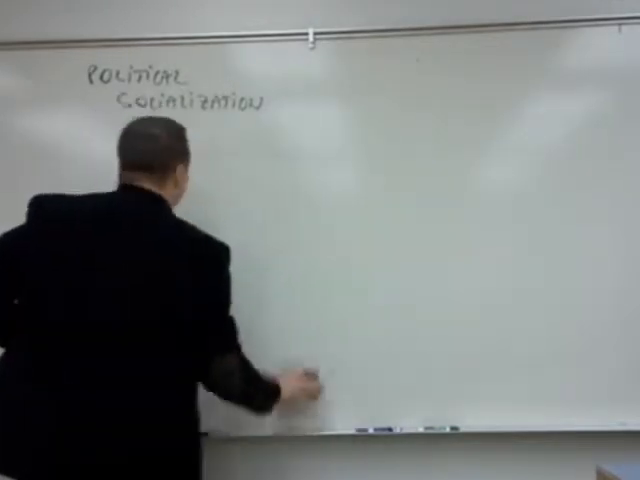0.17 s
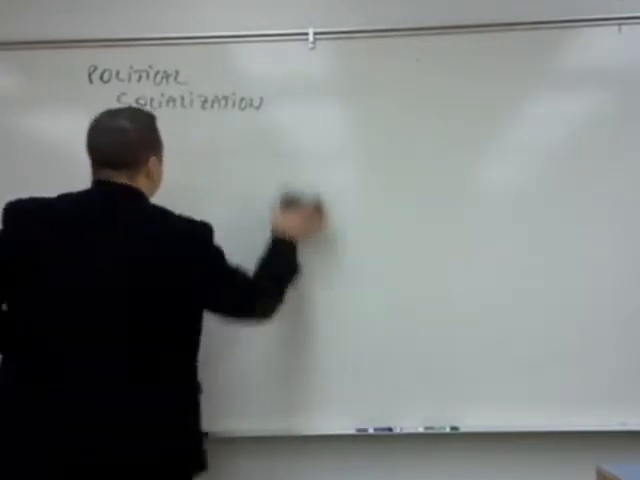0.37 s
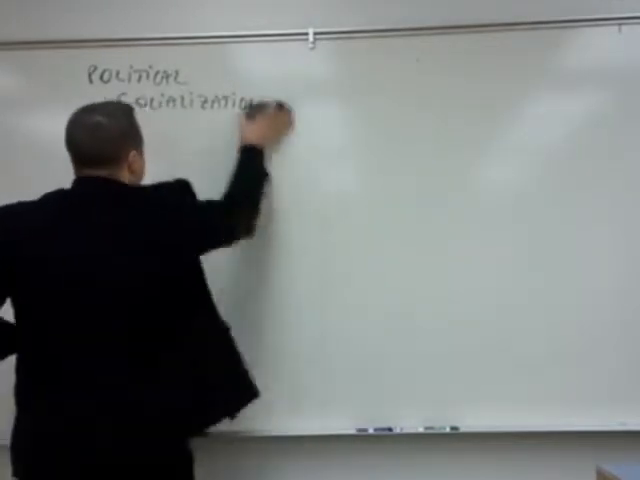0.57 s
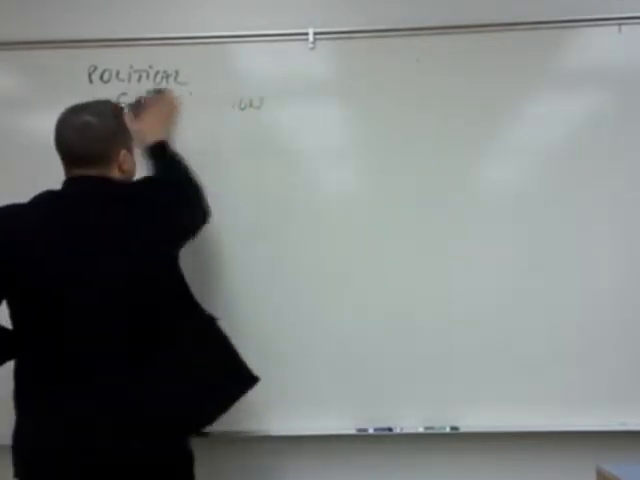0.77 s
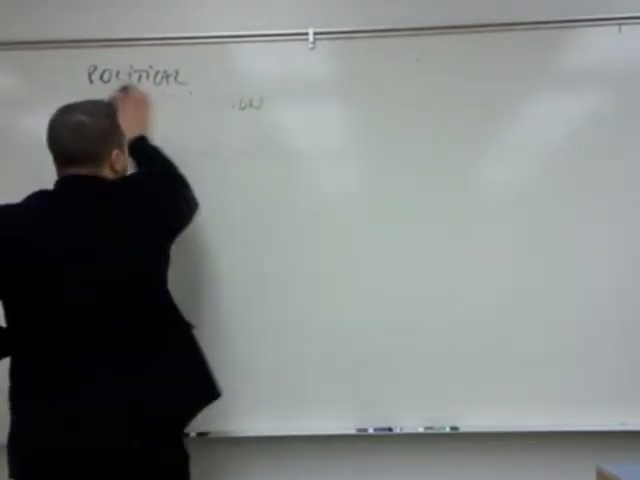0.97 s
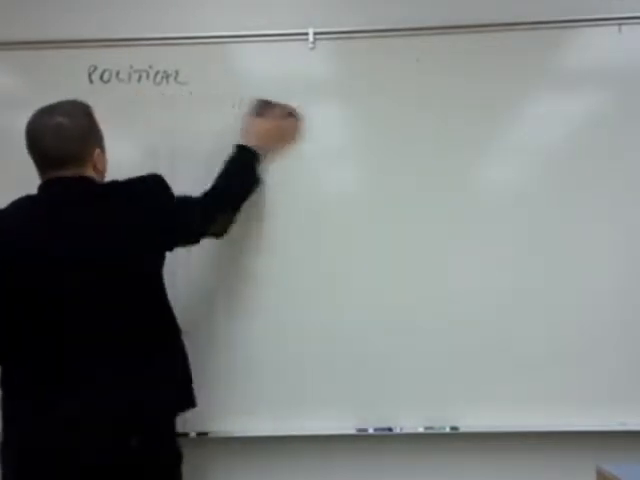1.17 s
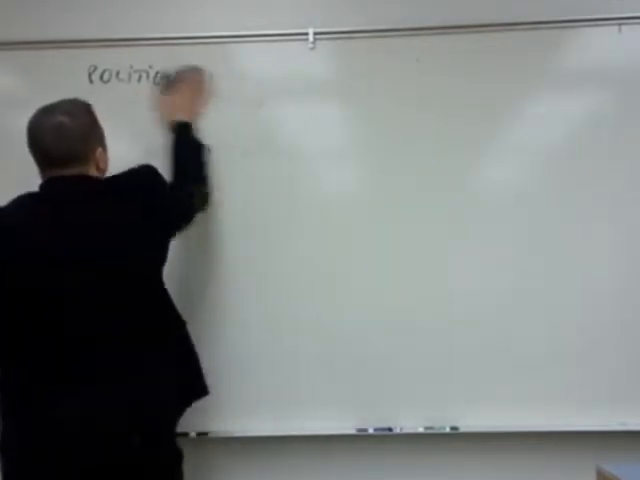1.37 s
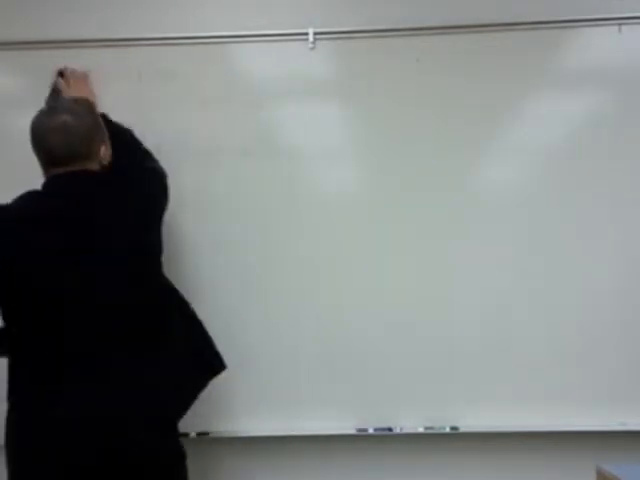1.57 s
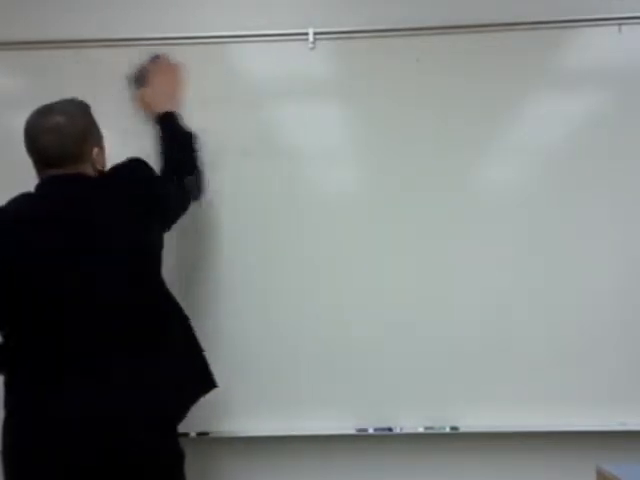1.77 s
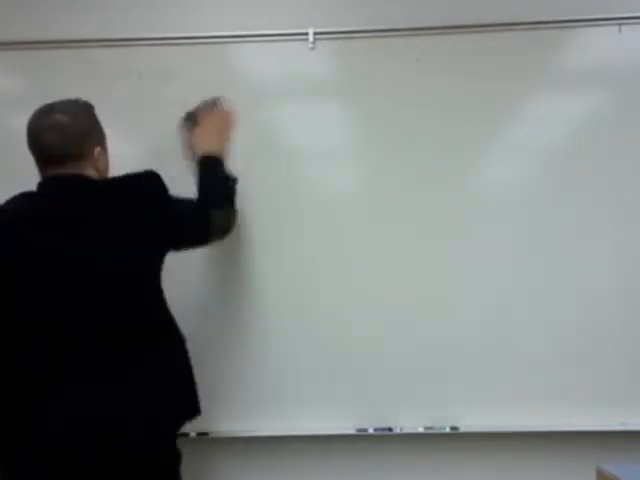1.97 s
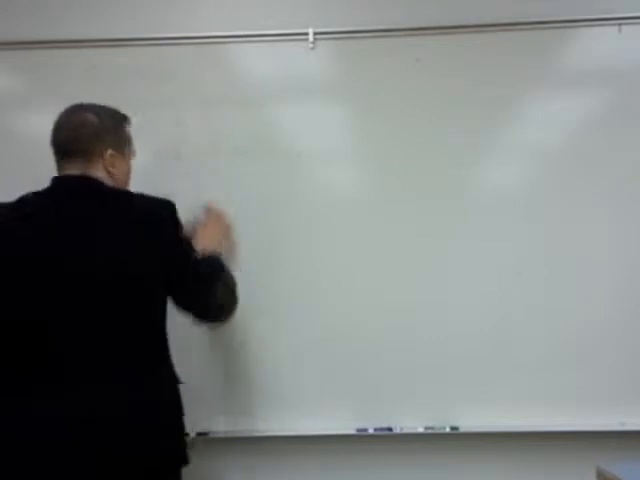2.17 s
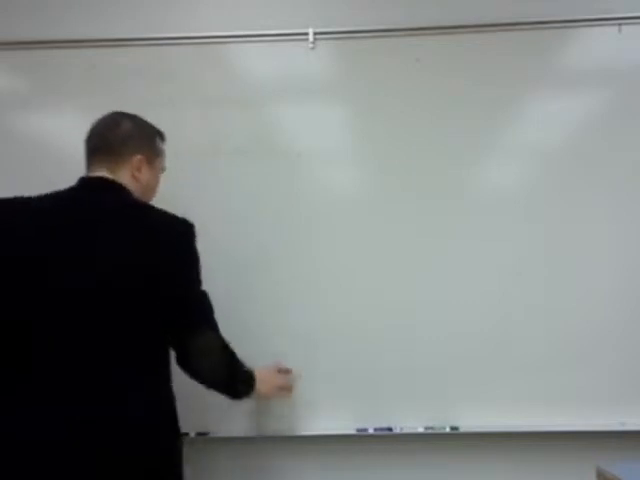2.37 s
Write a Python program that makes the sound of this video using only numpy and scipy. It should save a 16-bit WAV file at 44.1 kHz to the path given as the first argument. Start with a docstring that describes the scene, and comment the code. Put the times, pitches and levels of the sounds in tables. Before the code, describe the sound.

Quick, scratchy eraser strokes rub over a whiteboard with a few clicks and bumps, framed by a soft knock and sleeve rustle at each end. The quiet classroom hums faintly, heard from across the room through a slightly shrill microphone.

```python
"""A quiet classroom: ventilation rumbles and the lights hum throughout. A felt eraser knocks and scuffs
off the tray of a whiteboard, and a sleeve rustles as the arm rises. From about 0.8 s the felt hisses
over the board in quick strokes, with a few clicks and bumps; near 2.3 s the arm comes down and the
eraser knocks again. A small stereo microphone across the room hears it all, with a shrill port
resonance on each side and an expander that lets the room noise rise whenever the eraser is loud."""
import sys
import numpy as np
from scipy import signal
from scipy.fft import rfft, irfft
from scipy.io import wavfile

SR = 44100
rng = np.random.default_rng(int(sys.argv[2]) if len(sys.argv) > 2 else 0)


def generate_wav(sig):
    """Save sig (samples, or channels by samples) to the path in sys.argv[1] as 16-bit PCM at SR."""
    pcm = np.round(np.clip(np.atleast_2d(sig).T, -1, 1) * 32767).astype(np.int16)
    wavfile.write(sys.argv[1], SR, pcm)


N = 106104
ROOM_T60_S, ROOM_WET_DB = 0.85, -13


def amp(db):
    """dB to gain."""
    return 10 ** (np.asarray(db) / 20)


def unit(x):
    """Scale to rms 1."""
    return x / np.sqrt(np.mean(x ** 2) + 1e-20)


def envelopes(rows):
    """One gain curve for each dB column of a timed table, silent outside its span."""
    times, *columns = np.transpose(rows)
    return [amp(np.interp(np.arange(N) / SR, times, db, left=-120, right=-120)) for db in columns]


def at_hz(points):
    """A table read at every FFT bin on a log axis."""
    hz, v = np.transpose(points)
    return np.interp(np.log(np.arange(N // 2 + 1) * SR / N + 1), np.log(hz), v)


def colour(x, spectrum):
    """Give x a spectrum; rms 1."""
    return unit(irfft(rfft(x) * amp(at_hz(spectrum)), N))


def resonate(x, hz, width_hz, lift_db):
    """Lift one resonant band of x."""
    r = np.exp(-np.pi * width_hz / SR)
    poles = [1, -2 * r * np.cos(2 * np.pi * hz / SR), r * r]
    peak = signal.lfilter(np.array([1, 0, -1]) * (1 - r * r) / 2, poles, x)
    return x + (amp(lift_db) - 1) * peak


def drift(rate_hz):
    """Slow chance, spread 1."""
    r = np.exp(-2 * np.pi * rate_hz / SR)
    return unit(signal.lfilter([1], [1, -2 * r, r * r], rng.standard_normal(N + SR))[SR:])


def linger(gain, time_s):
    """Power follows with a lag."""
    r = np.exp(-1 / (time_s * SR))
    return np.sqrt(signal.lfilter([1 - r], [1, -r], gain ** 2))


# Stereo image, narrow lows and wide highs. Each row: frequency in Hz, left-right correlation.
STEREO_LIKENESS = [(40, 0.98), (130, 0.96), (290, 0.84), (630, 0.51), (1200, 0.014), (2500, 0.19),
                   (4500, 0.077), (8000, 0.16), (14400, 0.035)]
def spread(streams, left_lag_s=0.00005):
    """Two streams become a stereo pair, alike mainly in the bass, the left a little late."""
    mid, side = rfft(streams)
    alike = at_hz(STEREO_LIKENESS)
    pair = np.sqrt(1 + alike) * mid + np.sqrt(1 - alike) * side * [[1], [-1]]
    bin_hz = np.arange(N // 2 + 1) * SR / N
    delay = np.exp(-2j * np.pi * bin_hz * left_lag_s * np.array([[1], [0]]))
    return irfft(pair * delay, N)


# Tone of the air bed. Each row: frequency in Hz, relative level in dB.
AIR_EQ = [(25, -12), (45, -2.5), (65, -2), (78, -0.5), (89, 2), (108, -6), (135, -2.5), (175, -3.5),
          (225, -9), (300, -7.5), (400, -13), (500, -14), (1000, -22), (2000, -26.5), (4000, -28.5),
          (8000, -36), (15000, -31.5)]
def ventilation(level_db=-51, flutter_db=0.3):
    """Moving air lays down a bass-heavy bed of noise that flutters faintly."""
    gain = amp(level_db + flutter_db * drift(12))
    return gain * colour(spread(rng.standard_normal((2, N))), AIR_EQ)


# Partials of the hum. Each row: frequency in Hz, rms level in dB.
HUM_PARTIALS = [(120, -62), (360, -61.5), (600, -73), (720, -76), (1200, -83), (1680, -79.5)]
def lights(waver_db=2.5, wander_rad=0.35):
    """The lights hum at multiples of the mains buzz, each wavering in level and phase."""
    t, hum = np.arange(N) / SR, np.zeros(N)
    for hz, db in HUM_PARTIALS:
        gain = np.sqrt(2) * amp(db + waver_db * drift(5))
        phase = 2 * np.pi * (hz * t + rng.random()) + wander_rad * drift(14)
        hum += gain * np.sin(phase)
    return hum


def friction(slips_per_s=12000, unevenness_db=1.5):
    """Felt fibres slip in dense, tiny, uneven jerks: a grainy stereo noise."""
    sizes = amp(unevenness_db * np.minimum(rng.exponential(1, (2, N)), 4))
    signs = rng.choice([-1, 1], (2, N))
    slipping = rng.random((2, N)) < slips_per_s / SR
    return spread(sizes * signs * slipping)


def in_room(gain):
    """The envelope of a rub heard from afar: part direct, part hanging on in the room."""
    wet = amp(ROOM_WET_DB)
    tail = linger(gain, ROOM_T60_S / np.log(1e6))
    return np.hypot(np.sqrt(1 - wet ** 2) * gain, wet * tail)


# Off the tray, then the sleeve as the arm rises. Each row: time in seconds, rub in dB, drag in dB.
LIFT_LEVELS = [(0.0, -64, -80), (0.06, -56.5, -77), (0.12, -59.5, -64), (0.17, -54, -72), (0.198, -54, -68),
               (0.206, -45.5, -74), (0.222, -48.5, -68), (0.26, -51, -62), (0.29, -52, -54.5),
               (0.34, -52.5, -56.5), (0.37, -58.5, -66.5), (0.76, -58.5, -68), (0.85, -78, -76)]
# The sleeve as the arm comes down. Each row: time in seconds, rub in dB.
LOWER_LEVELS = [(2.33, -78), (2.38, -56.5), (2.41, -56.5)]
# Tones of the broad rub and the duller drag. Each row: frequency in Hz, relative level in dB.
RUB_EQ = [(200, -36), (700, 0), (1300, 4), (2500, -2), (4000, -1), (6000, -1), (9000, -4), (15000, -4.5)]
DRAG_EQ = [(800, -14), (1500, -14), (2200, 2), (3000, 5.5), (3800, 3.5), (5000, -7), (8000, -38)]
# The hollow tray sings along with the rub. Each row: centre in Hz, width in Hz, lift in dB.
TRAY_RESONANCES = [(733, 26, 13), (7060, 390, 3.5)]
def handling():
    """Felt scuffs and a sleeve rustles as the eraser leaves the tray and comes down again."""
    lift_gain, drag_gain = envelopes(LIFT_LEVELS)
    lower_gain = envelopes(LOWER_LEVELS)[0]
    rub = colour(friction(), RUB_EQ)
    for resonance in TRAY_RESONANCES:
        rub = resonate(rub, *resonance)
    drag = colour(friction(), DRAG_EQ)
    return in_room(lift_gain + lower_gain) * rub + in_room(drag_gain) * drag


# Modes of the eraser block. Each row: frequency in Hz, relative level in dB, seconds to fall 60 dB.
BLOCK_MODES = [(486, 0.5, 0.025), (467, 4, 0.04), (716.4, -10, 0.17), (1220, -13.5, 0.053)]
# Hits of the block. Each row: start in seconds, ring in dB, hardness as a tilt of the modes in dB per
# octave, click in dB before its low-pass, that low-pass in Hz, panel thud in dB.
BLOCK_HITS = [(0.055, -52, -10, -70, 3000, -39.5), (0.2099, -63, 14, -44, 8600, -61),
              (0.780, -76, -4, -34, 3200, -90), (1.074, -73, 3, -37, 9000, -55),
              (1.086, -60, 4, -37, 9000, -67), (2.169, -66, -6, -64, 3000, -38),
              (2.375, -46.5, -18, -66, 3000, -42.5), (2.401, -49.5, -14, -73, 3000, -77)]
def knocks(click_t60_s=0.004, thud_hz=109, thud_t60_s=0.081, rise_s=0.00051):
    """Each contact clicks, rings the block's modes and draws a low thud from the panel."""
    t = np.arange(SR // 10) / SR
    attack = 1 - np.exp(-t / rise_s)
    track = np.zeros(N + SR)
    for start_s, ring_db, hardness, click_db, top_hz, thud_db in BLOCK_HITS:
        ring = np.zeros(len(t))
        for hz, db, t60_s in BLOCK_MODES:
            tilt_db = hardness * np.log2(hz / BLOCK_MODES[0][0])
            mode_db = ring_db + db + tilt_db + rng.normal(0, 1)
            ring += amp(mode_db - 60 * t / t60_s) * np.sin(2 * np.pi * hz * t)
        burst = amp(click_db - 60 * t / click_t60_s) * rng.choice([-1, 1], len(t))
        click = signal.sosfilt(signal.butter(4, top_hz, fs=SR, output="sos"), burst)
        thud = amp(thud_db - 60 * t / thud_t60_s) * np.sin(2 * np.pi * thud_hz * t)
        track[int(start_s * SR):][:len(t)] += (ring + thud) * attack + click
    return track[:N]


def classroom(x, fade_in_s=0.0032):
    """The walls add a diffuse, dying stereo tail to the direct sound."""
    t = np.arange(N) / SR
    envelope = amp(-60 * t / ROOM_T60_S) * np.clip(t / fade_in_s, 0, 1)
    tail = spread(rng.standard_normal((2, N))) * envelope
    tail = tail[:, :SR // 2] / np.sqrt(np.sum(tail ** 2, axis=1, keepdims=True))
    wet = amp(ROOM_WET_DB)
    return np.sqrt(1 - wet ** 2) * x + wet * signal.fftconvolve(x[None], tail, axes=1)[:, :N]


# The strokes. Each row: time in seconds, hiss in dB, drag in dB, hollow panel scrape in dB.
STROKE_LEVELS = [(0.765, -79, -74, -80), (0.78, -57.5, -69, -61), (0.81, -50.5, -55.5, -65),
                 (0.845, -49, -57, -65), (0.88, -47.5, -53.5, -64), (0.93, -48.5, -55.5, -62),
                 (0.99, -49.5, -58.5, -64.5), (1.052, -55.5, -60, -73), (1.072, -52, -60, -55.5),
                 (1.115, -50, -64.5, -58), (1.19, -47, -60.5, -63), (1.28, -45.5, -74, -81),
                 (1.345, -50, -61, -77), (1.375, -48.5, -60, -75), (1.44, -48.5, -58, -67),
                 (1.56, -45, -56.5, -63.5), (1.69, -47, -60.5, -58), (1.728, -52.5, -59, -65),
                 (1.78, -47.5, -77, -62), (1.9, -44, -63, -83), (2.0, -45.5, -67, -59),
                 (2.09, -48, -58, -68), (2.15, -45.5, -60, -66), (2.18, -49, -62, -77),
                 (2.225, -55.5, -65, -67), (2.29, -60.5, -74, -72)]
# The hiss pans as the hand travels. Each row: time in seconds, left over right in dB.
HISS_BALANCE = [(0.75, -1.2), (1.1, 0.4), (1.95, -.5), (2.14, -1), (2.3, -1)]
# Tones of the hiss, hollow scrape and panel rumble. Each row: frequency in Hz, relative level in dB.
HISS_EQ = [(1000, -33), (2500, -15), (4000, -4), (6000, 0.5), (8000, 1.5), (10000, 0), (12000, -0.5),
           (15000, -1)]
HOLLOW_EQ = [(200, -13), (400, -3), (600, 0), (900, 2), (1300, 5), (1800, 1), (3000, -16)]
RUMBLE_EQ = [(30, -25), (65, 2), (90, -17), (135, 5), (200, -7), (300, -12), (500, -13.5), (900, -22)]
def wiping(judder_db=0.48, judder_hz=20, rumble_vs_hiss_db=-11, rumble_lag_s=0.036):
    """Sliding felt hisses, drags and scrapes with one shared judder; panel rumble swells behind."""
    judder = amp(judder_db * drift(judder_hz))
    hiss_gain, drag_gain, hollow_gain = judder * envelopes(STROKE_LEVELS)
    pan_db = np.interp(np.arange(N) / SR, *np.transpose(HISS_BALANCE))
    pan = amp(pan_db / 2 * np.array([[1], [-1]]))
    rumble = amp(rumble_vs_hiss_db) * linger(hiss_gain, rumble_lag_s) * colour(friction(), RUMBLE_EQ)
    hiss = in_room(hiss_gain * pan) * colour(friction(), HISS_EQ)
    drag = in_room(drag_gain) * colour(friction(), DRAG_EQ)
    hollow = in_room(hollow_gain) * colour(friction(), HOLLOW_EQ)
    return rumble + hiss + drag + hollow


# One short scratchy accent. Each row: time in seconds, level in dB.
SCUFF_LEVELS = [(1.064, -72), (1.074, -54), (1.1, -55.5), (1.125, -75)]
def edge_scuff(hz=5100, width_hz=1900):
    """The felt's edge scratches as it is pressed on again, pitched between drag and hiss."""
    gain = envelopes(SCUFF_LEVELS)[0]
    band = signal.butter(2, [hz - width_hz / 2, hz + width_hz / 2], "band", fs=SR, output="sos")
    return in_room(gain) * unit(signal.sosfilt(band, friction()))


def scene():
    """The eraser in the classroom, over a bed of air and hum."""
    return wiping() + edge_scuff() + handling() + classroom(knocks()) + ventilation() + lights()


def expander(x, knee_db=-47, softness_db=1.5, lag_s=0.0073, key_low_cut_hz=990):
    """Turn everything down while the treble is quiet, and let it back up when the treble is loud."""
    key = signal.sosfilt(signal.butter(2, key_low_cut_hz, "high", fs=SR, output="sos"), x)
    key_rms = linger(np.sqrt(np.mean(key ** 2, axis=0)), lag_s)
    key_db = 20 * np.log10(key_rms + 1e-6)
    cut_db = 5.5 / (1.5 + np.exp((key_db - knee_db) / softness_db))   # at most about 3.7 dB
    return x * amp(-cut_db)


# Shrill microphone ports, left then right. Each row: centre in Hz, width in Hz, lift in dB.
MIC_PORTS = [(7213, 1160, 15), (8610, 1800, 13)]
def record(dry):
    """The microphone: resonant ports, a low cut, the expander and a steep top cut."""
    gain_db, left_louder_db, low_cut_hz, top_cut_hz = -2, 1.5, 74, 14650
    x = np.array([resonate(channel, *port) for channel, port in zip(dry, MIC_PORTS)])
    x *= amp(gain_db + left_louder_db / 2 * np.array([[1], [-1]]))
    x = signal.sosfilt(signal.butter(2, low_cut_hz, "high", fs=SR, output="sos"), x)
    flat_to_hz = top_cut_hz - 170
    return signal.sosfilt(signal.ellip(14, 0.3, 75, flat_to_hz, fs=SR, output="sos"), expander(x))


dry = scene()
out = record(dry)
generate_wav(out)
```